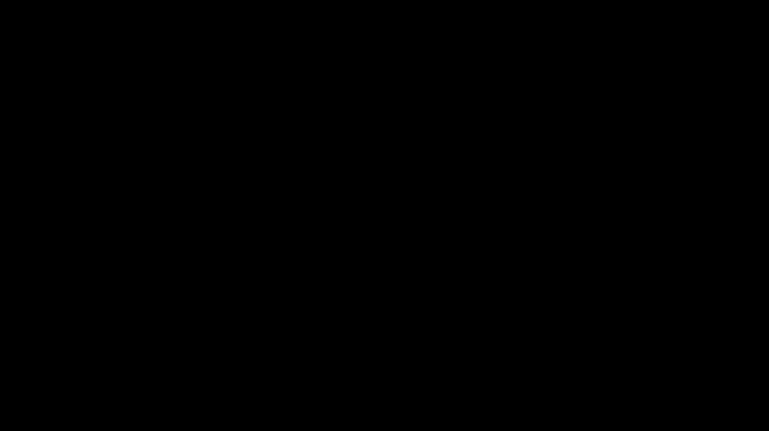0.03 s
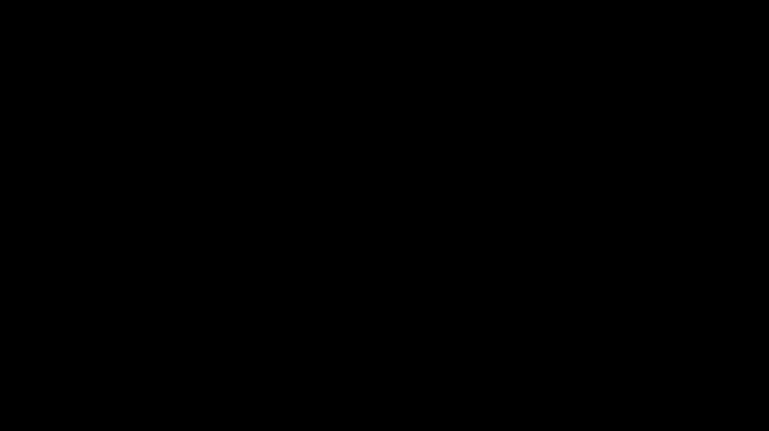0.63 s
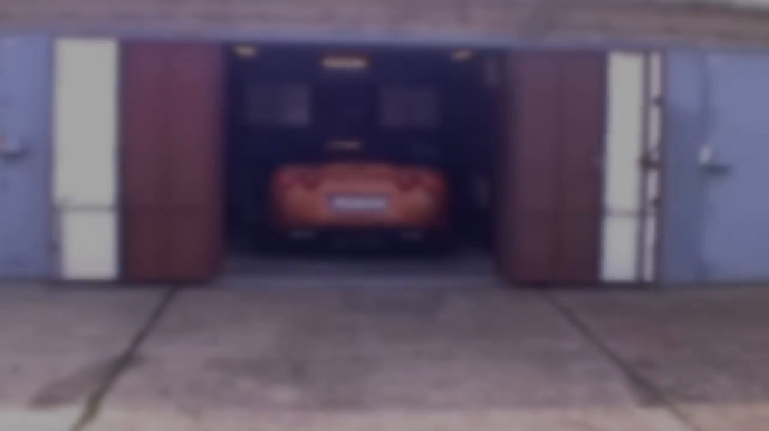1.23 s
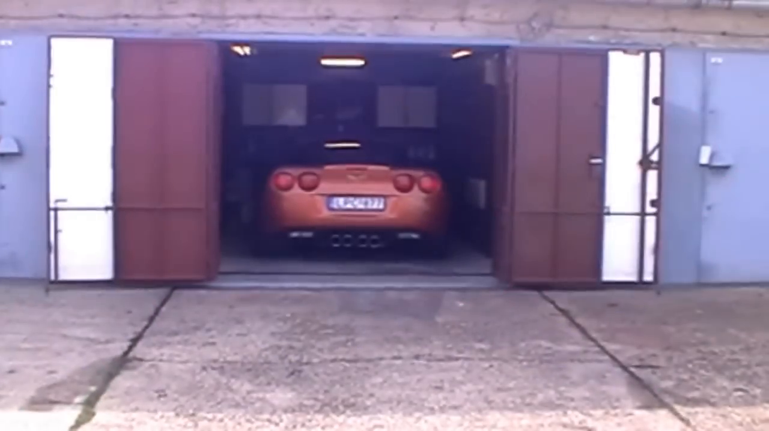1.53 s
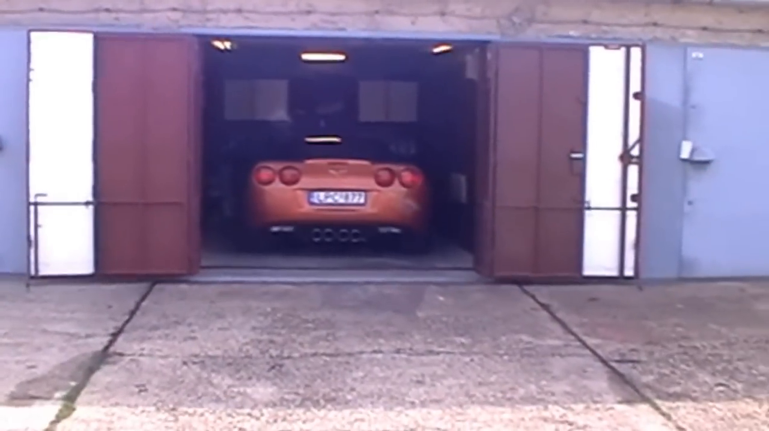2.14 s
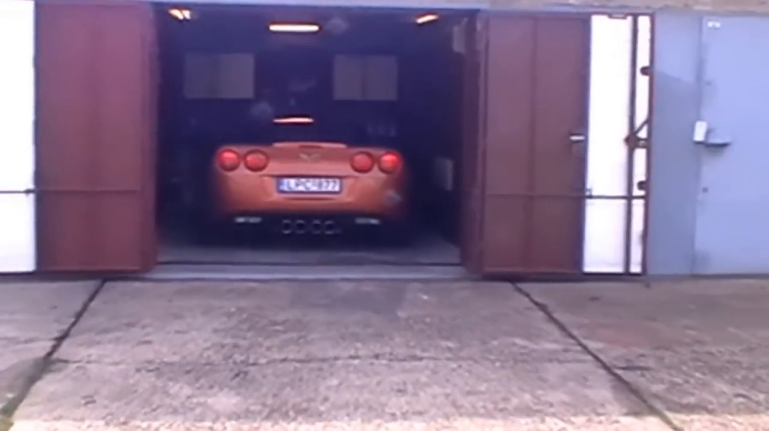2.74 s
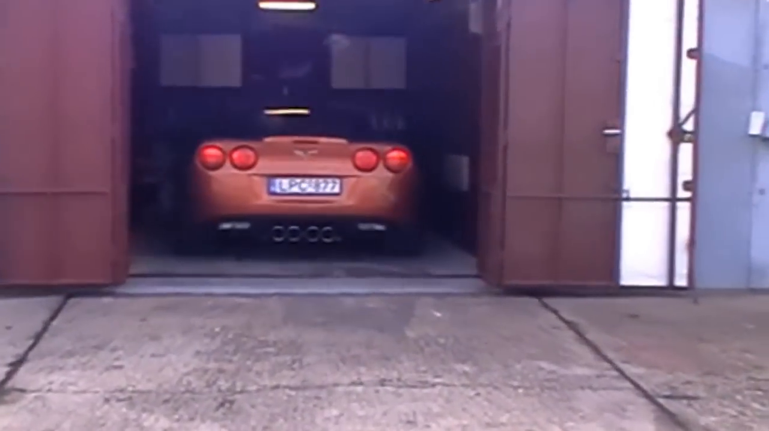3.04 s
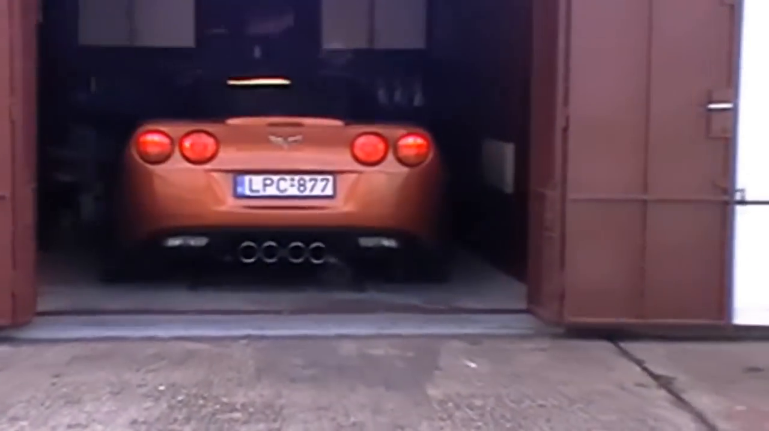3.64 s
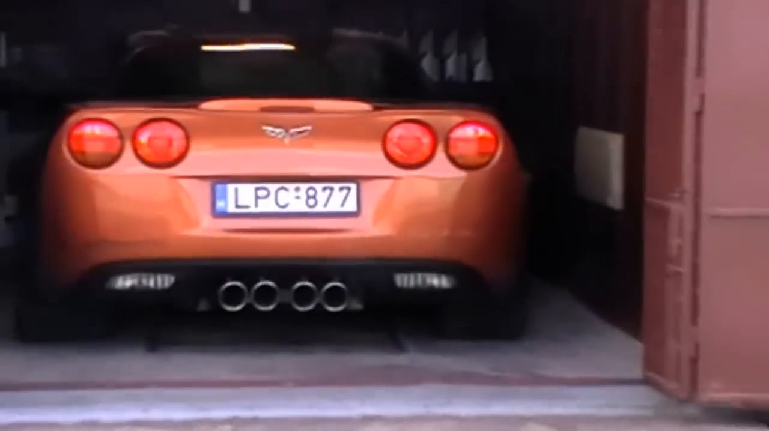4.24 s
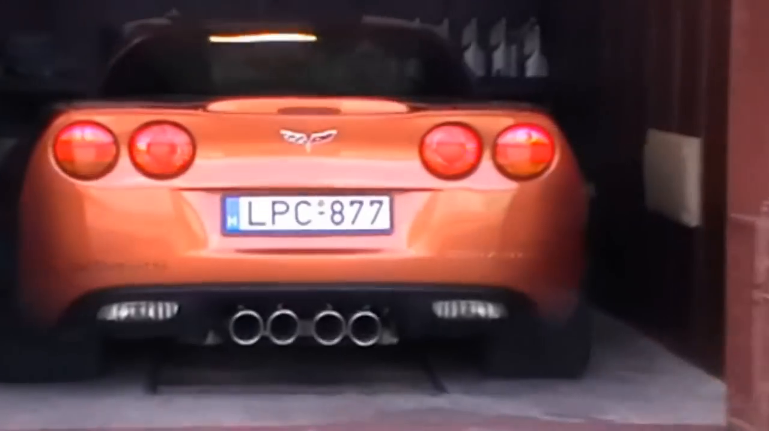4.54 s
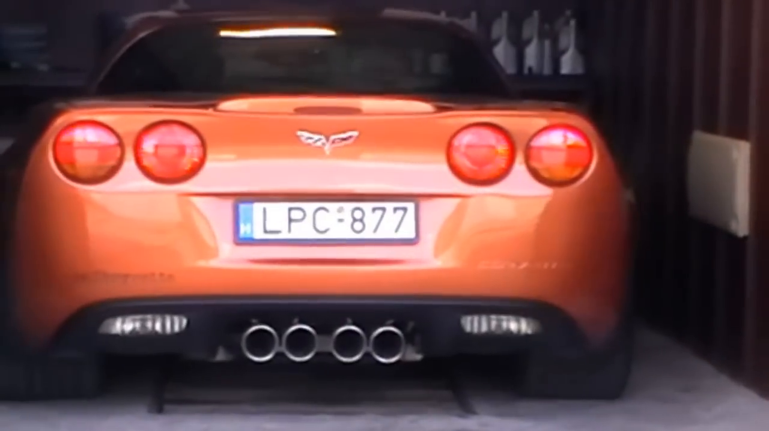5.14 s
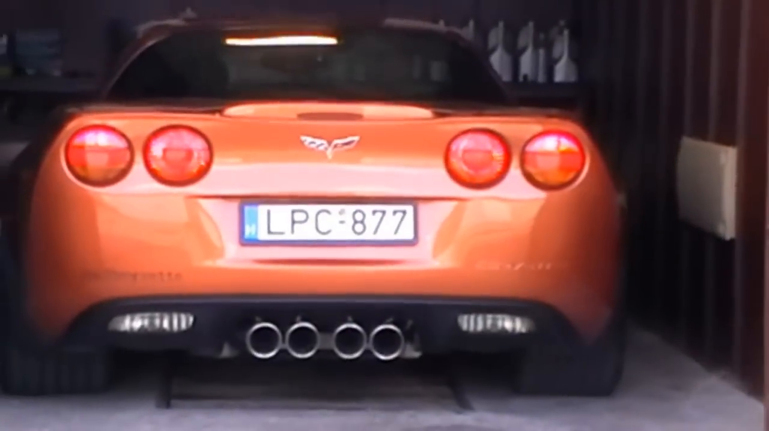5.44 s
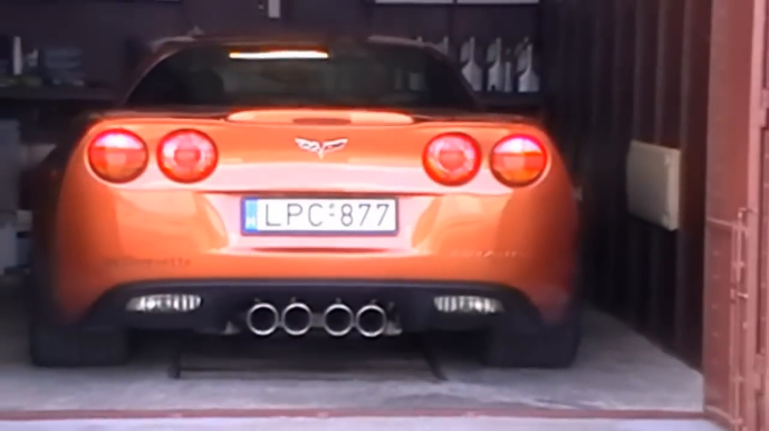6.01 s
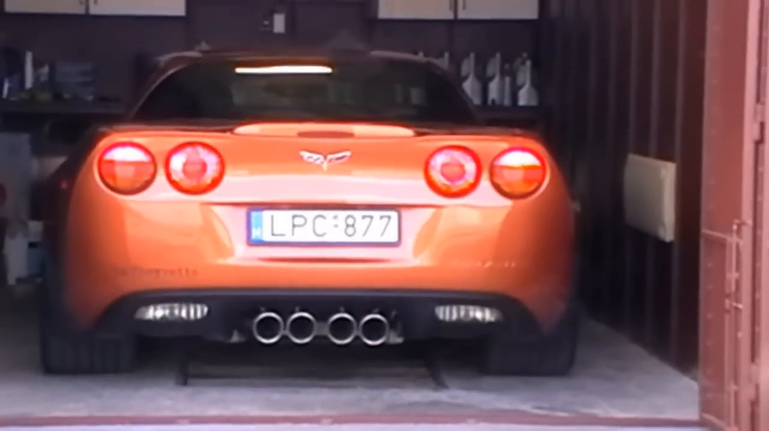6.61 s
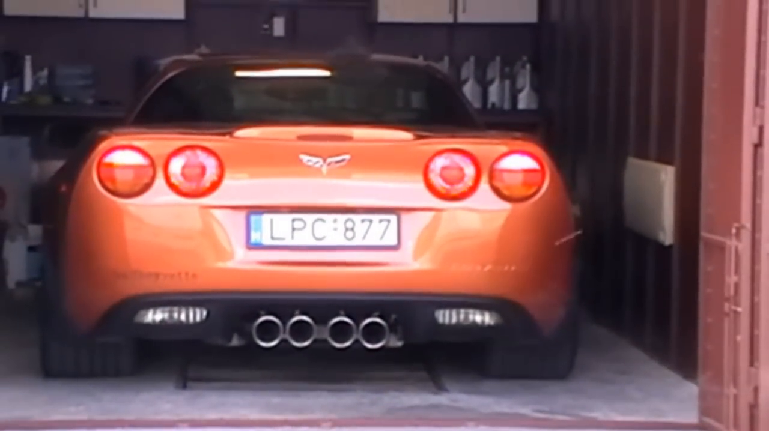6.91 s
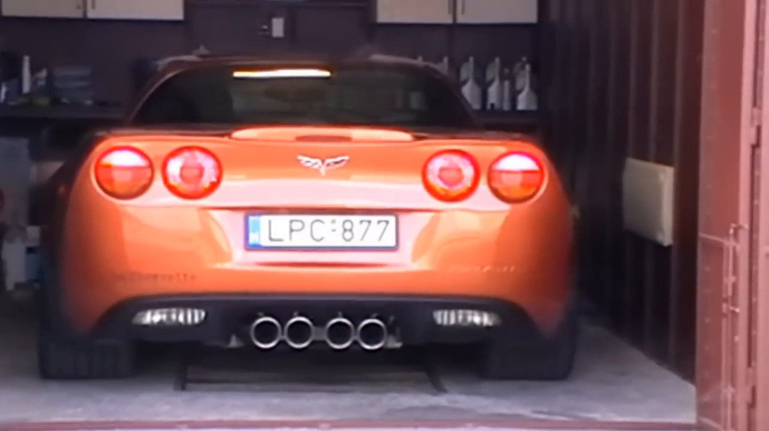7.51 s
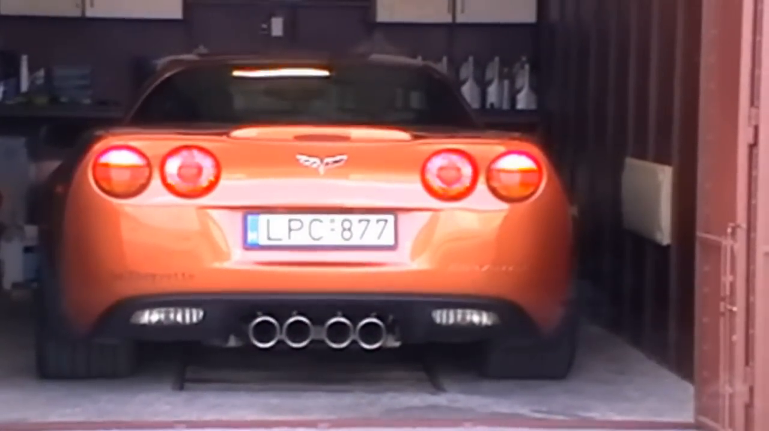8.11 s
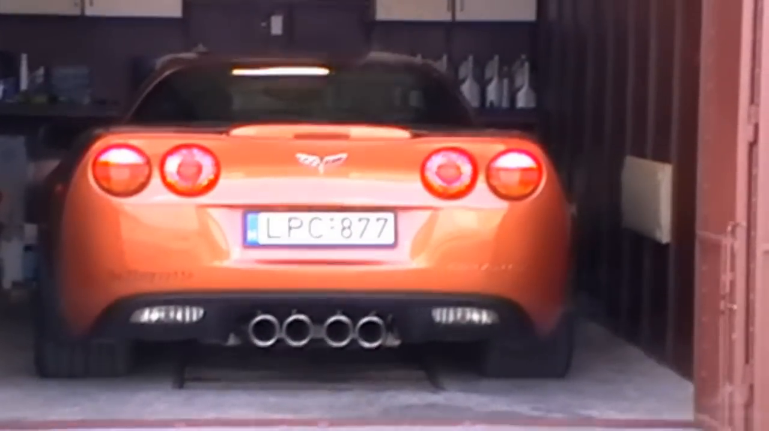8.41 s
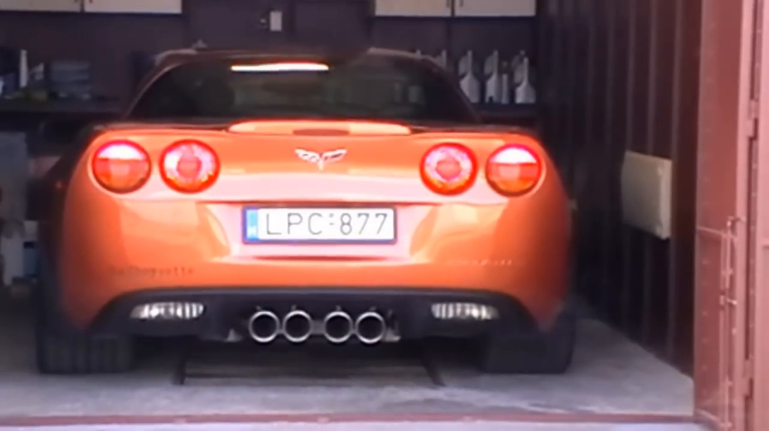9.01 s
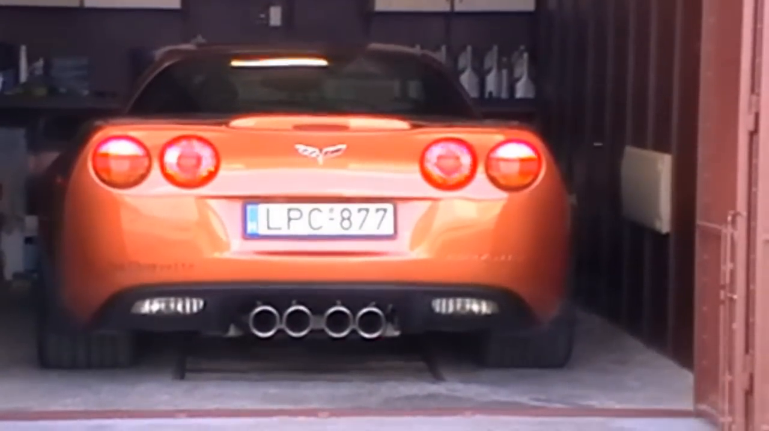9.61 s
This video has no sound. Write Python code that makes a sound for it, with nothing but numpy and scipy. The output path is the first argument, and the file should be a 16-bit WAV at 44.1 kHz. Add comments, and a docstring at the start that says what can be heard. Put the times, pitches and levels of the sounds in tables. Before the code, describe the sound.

A starter grinds and a big eight-cylinder engine catches with a bang, then drops to a throbbing idle booming through open garage doors.

```python
"""A quiet yard hums; then soft scuffs and a relay's click come through the open doors of a garage.
Inside, a big eight-cylinder sports car starts cold, heard from a stereo pair of microphones in the yard.
The starter grinds over a few compressions, the engine catches with a bang, flares, coasts down in a
smooth drone and takes up a loping idle of exhaust pulses, gas rasp and valve ticks.
The garage booms whenever the hunting idle meets its lowest resonance."""
import sys
import numpy as np
from scipy import signal
from scipy.fft import rfft, irfft, next_fast_len
from scipy.io import wavfile
from scipy.ndimage import uniform_filter1d, minimum_filter1d

SR = 44100
rng = np.random.default_rng(int(sys.argv[2]) if len(sys.argv) > 2 else 0)


def int16_out(signal):
    """Quantize to a 16-bit WAV file."""
    q = np.round(np.clip(np.atleast_2d(signal).T, -1, 1) * 32767)
    wavfile.write(sys.argv[1], SR, q.astype(np.int16))


N = 429975
TIME = np.arange(N) / SR
LEFT_RIGHT = np.array([[1], [-1]])
CATCH_S, STARTER_ON_S, STARTER_OFF_S = 3.315, 2.56, 3.4
TOP_HZ = 15600


def undb(db):
    """Decibels to amplitude."""
    return 10 ** (np.asarray(db) / 20)


def unit(x):
    """Scale to rms 1."""
    return x / np.sqrt(np.mean(x ** 2))


def after(s, rise_s):
    """A gate that opens at s."""
    return np.clip((TIME - s) / rise_s, 0, 1)


def gate(on_s, rise_s, off_s, fall_s):
    """Attack, hold and release."""
    return after(on_s, rise_s) * (1 - after(off_s, fall_s))


def swell(s, rise_s, decay_s):
    """Rise to a peak at s, then die away."""
    return after(s - rise_s, rise_s) * np.exp(-np.maximum(TIME - s, 0) / decay_s)


def noise():
    """White noise."""
    return rng.standard_normal(N)


def walk(per_s):
    """Slow random drift with a spread near 1."""
    hold = int(SR / per_s)
    steps = np.repeat(rng.standard_normal(N // hold + 1), hold)
    return 1.3 * uniform_filter1d(uniform_filter1d(steps, hold), hold)[:N]


def scatter(count, spread_db):
    """Random strengths within a range of dB."""
    return undb(spread_db * rng.uniform(-1, 1, count))


def colour(x, points, size=16384):
    """Minimum-phase filter through (f/Hz, level/dB) points."""
    hz, db = np.transpose(points)
    bins_hz = np.maximum(np.arange(size // 2 + 1) * SR / size, 1)
    cepstrum = irfft(np.log(undb(np.interp(np.log(bins_hz), np.log(hz), db))))
    cepstrum[1:size // 2] *= 2
    cepstrum[size // 2 + 1:] = 0
    return signal.fftconvolve(x, irfft(np.exp(rfft(cepstrum))))[:N]


def band_noise(points):
    """Coloured noise at rms 1."""
    return unit(colour(noise(), points))


def pulses(times, sizes):
    """One click at each time."""
    return np.bincount(np.clip(times * SR, 0, N).astype(int), sizes, N + 1)[:N]


def fade(x, decay_s):
    """Give every click an exponential tail."""
    return signal.lfilter([1], [1, -np.exp(-1 / (decay_s * SR))], x)


# open air all around the microphones: f/Hz, level/dB
YARD_SPECTRUM = [(18,-40), (35,-11.5), (60,-5.5), (110,-1), (165,-2.5), (225,-9.5), (375,-9.5), (470,-16.5),
                 (1090,-22.5), (1600,-25), (3600,-35), (7000,-40.5), (15000,-50.5)]
def yard():
    """Quiet outdoor hum that wavers a little."""
    mid, side = (band_noise(YARD_SPECTRUM) * undb(0.8 * walk(9.5)) for _ in range(2))
    return undb(-43.5) * (mid + undb(-4.5) * side * LEFT_RIGHT)


def garage(x, wet_db, side_db, t60_s=0.42):
    """Direct sound and the garage's tail; the two microphones differ most in the top octave."""
    t = TIME[:int(.7 * SR)]
    tails = rng.standard_normal((2, len(t))) * undb(-60 * t / t60_s) * (t > .004)
    mid, side = (signal.fftconvolve(x, tail / np.linalg.norm(tail))[:N] for tail in tails)
    side = colour(side, [(150, -1), (600, -2), (4000, -2), (7000, -4.5), (11000, 11.5)])
    return (x + undb(wet_db) * mid + undb(side_db) * side * LEFT_RIGHT) / np.hypot(1, undb(wet_db))


def garage_rumble(gas_db):
    """Exhaust flow stirs the lowest resonance of the garage."""
    air = [(12, -9), (30, 1.5), (50, 2.5), (62, 14), (74, 12), (110, 4.5), (400, -44.5)]
    mid, side = band_noise(air), band_noise(air)
    return (mid + undb(-4) * side * LEFT_RIGHT) * undb(-20 + 0.51 * gas_db) * after(CATCH_S, .02)


# clicks from the car indoors, the loudest the ignition relay: t/s, level/dB, decay/s, low-pass f/Hz
CAR_CLICKS = [(0.837, -33.5, 0.0034, 5000), (1.6, -43, .012, 4000), (2.167, -30.5, 0.022, 15000)]
# their tone from the yard: f/Hz, level/dB
CLICK_SPECTRUM = [(300, -20), (750, 4), (1300, -4), (2100, 4.5), (3200, 4), (4500, -8.5), (8000, -2),
                  (11000, -11), (15500, -27)]
# soft scuffs in the garage: t/s, level/dB, half length/s
SOFT_SCUFFS = [(0.754, -49, 0.065), (2.434, -44, 0.036)]
def clicks_and_scuffs():
    """Sharp clicks and dull scuffs echo in the garage before the start."""
    click = band_noise(CLICK_SPECTRUM)
    sound = 0
    for s, db, decay_s, top_hz in CAR_CLICKS:
        dulled = signal.sosfilt(signal.butter(2, min(top_hz, TOP_HZ), fs=SR, output="sos"), click)
        sound += undb(db) * dulled * after(s, 0.0035) * np.exp(-np.abs(TIME - s) / decay_s)
    scuffs = sum(undb(db) * np.exp(-((TIME - s) / half_s) ** 2) for s, db, half_s in SOFT_SCUFFS)
    sound += scuffs * band_noise([(200, -11), (700, 6), (1400, -3), (3000, -15), (12000, -38)])
    return garage(sound, wet_db=-2.5, side_db=-6, t60_s=0.55)


# metal modes inside the car: f/Hz, t60/s, level/dB
METAL_MODES = [(619, 0.3, 3), (881.5, 0.31, 9.5), (1065, 0.15, -5), (1350, 0.44, 6.5), (1560, 0.42, -8.5),
               (2112, 0.073, 4.5), (3030, .2, -28), (4106, .2, -6.5)]
def drivetrain(x, ring_db):
    """Metal parts ring along with whatever shakes them."""
    t = TIME[:SR // 2]
    ring = sum(undb(db - 60 * t / t60) * np.cos(2 * np.pi * hz * t) / t60 for hz, t60, db in METAL_MODES)
    return x + undb(ring_db) * signal.fftconvolve(x, ring)[:N] / SR


# valve gear and belts, faint from out in the yard: f/Hz, level/dB
VALVE_SPECTRUM = [(700, -20.5), (1600, 2.5), (2300, 3.5), (3200, -1), (4300, -9.5), (5500, -5),
                  (7600, -1.5), (9000, -6.5), (10700, -12.5), (12000, -23.5), (14000, -26), (15500, -37.5)]
def valve_gear(times, cylinder, valve_db):
    """Four uneven ticks a cycle over the hiss of belts and intake."""
    tick_times = times[cylinder % 2 == 1]
    ticks = pulses(tick_times, scatter(len(tick_times), spread_db=9.5))
    clatter = unit(unit(fade(ticks, 0.0074)) + 1.1) * undb(valve_db)
    hiss = unit(colour(drivetrain(noise(), ring_db=-2), VALVE_SPECTRUM))
    return garage(clatter * hiss * after(STARTER_OFF_S - .04, 0.037), wet_db=-6.5, side_db=-12)


# the starter's labour, hardest as the engine overruns it: peak t/s, rise/s, level/dB
STARTER_LOADS = [(2.85, .16, -18), (3.0, 0.034, -12.5), (3.138, 0.036, -11), (3.252, 0.013, -15.5),
                 (3.395, 0.024, -2.5)]
# bell housing and engine block, through the open doors: f/Hz, level/dB
HOUSING_SPECTRUM = [(50, -14), (110, -14), (175, -4), (245, -17.5), (320, 1), (420, -14.5), (520, -7.5),
                    (660, -0.5), (900, -1.5), (1150, -3), (1450, -4), (1700, -13), (3000, -17.5),
                    (8000, -54)]
# clashing teeth, from the same spot: f/Hz, level/dB
TOOTH_SPECTRUM = [(900, -17.5), (1800, -5), (3000, -0.5), (4500, -3.5), (5600, 0), (6800, -2.5), (8500, -8),
                  (10500, -17), (13000, -27), (15500, -47)]
def starter():
    """Pinion teeth clash on the ring gear and shake the bell housing, harder at each compression."""
    labour = sum(undb(db) * swell(s, rise_s, decay_s=0.038) for s, rise_s, db in STARTER_LOADS)
    scrape = undb(-15) * swell(STARTER_ON_S + 0.0095, 0.0076, decay_s=0.055)  # the teeth first meet
    mesh_hz = 230 * (1 + .1 * walk(9))
    teeth_passed = np.cumsum(mesh_hz) / SR
    times = np.interp(np.arange(int(teeth_passed[-1])), teeth_passed, TIME)
    teeth = unit(fade(pulses(times, scatter(len(times), spread_db=6.5)), 0.0019)) + 2
    grind = unit(colour(drivetrain(teeth * noise(), ring_db=22.5), HOUSING_SPECTRUM))
    grind *= np.hypot(undb(-19.5), labour)
    clash = unit(colour(drivetrain(teeth * noise(), ring_db=24.5), TOOTH_SPECTRUM))
    clash *= np.hypot(undb(-24), scrape + undb(-7.5) * labour)
    # the solenoid slams the pinion home
    clank = band_noise([(300, -18), (800, -4), (1000, 6.5), (1300, -11), (1800, -30), (3500, -6),
                        (5000, -31), (8000, -14), (12000, -33)])
    clank *= undb(-12.5) * np.exp(-np.maximum(TIME - STARTER_ON_S, 0) / 0.065)
    sound = (grind + clash + clank) * gate(STARTER_ON_S - .01, 0.027, STARTER_OFF_S - .04, 0.04)
    return garage(sound, wet_db=-4, side_db=-10.5, t60_s=0.65) * undb(-.5 * LEFT_RIGHT)


def catch():
    """The first rich firings shove out a low, ragged gust."""
    gust = band_noise([(15, -18), (35, -4), (65, 8), (110, -3), (300, -3.5), (1500, -52)])
    return garage(gust * undb(-9.5) * gate(CATCH_S, 0.012, 3.46, 0.081), wet_db=-21, side_db=-10.5)


def bark(times, sizes):
    """Under the first load the firings bark in the upper pipe resonances."""
    pipes = [(20, -45), (230, -19), (295, 8), (345, -1), (400, -18.5), (490, -6), (560, -22), (6000, -83)]
    ring = unit(colour(pulses(times, np.sqrt(sizes)), pipes))
    return garage(ring * undb(-12) * gate(3.34, 0.088, 3.47, 0.19), wet_db=1, side_db=-16)


# engine speed: t/s, four-stroke cycle f/Hz
CYCLE_RATE = [(3.32, 16.875), (3.43, 21.302), (3.83, 23.8), (4.23, 20.102), (4.68, 19.739), (5.5, 17.032),
              (5.67, 17.097), (6.54, 16.47), (7.2, 17.092), (7.98, 16.66), (8.53, 17.276), (8.87, 17.072),
              (9.75, 17.071)]
def engine_speed():
    """A flare, then a hunting idle: the cycle rate and the running count of cycles."""
    cycle_hz = np.interp(TIME, *np.transpose(CYCLE_RATE))
    return cycle_hz, np.cumsum(cycle_hz) / SR


# catch, flare, coast and idle from the yard: t/s, settling/s, level/dB of firings, gas and valve gear
START_STAGES = [(3.315, .01, -10.5, -15, -27.5), (3.42, 0.12, -17.5, -40, -44.5),
                (3.941, .06, -23.5, -43, -57.5), (4.88, 0.32, -12.5, -31, -43)]
def stage_levels():
    """Levels of firings, gas and valve gear, each gliding from one stage's value to the next."""
    levels = np.array(START_STAGES)[:, 2:, None]
    lag = np.array([[1], [1.4], [1]])  # the gas settles more slowly
    db = levels[0]
    for (s, settle_s, *_), step in zip(START_STAGES[1:], np.diff(levels, axis=0)):
        db = db + step * (1 - np.exp(-np.maximum(TIME - s, 0) / (settle_s * lag)))
    return db


# cylinders in firing order: even-cycle level/dB, odd-cycle level/dB, early by t/ms
FIRING_ORDER = [(3.4, -26.1, 3.6), (11.9, 12.2, 0.3), (11.6, -6.6, 0.2), (-7.9, 5.5, 2.6), (-2.2, 2.5, 1.7),
                (3.5, 5.0, 0.9), (-34.0, 9.9, 0.7), (8.7, 6.4, -0.0)]
def firings(cycles):
    """Time, strength and cylinder of every firing; the lope spans two cycles and no two burn alike."""
    count = len(FIRING_ORDER)
    index = np.arange(int(count * cycles[-1]))
    cylinder, odd = index % count, index // count % 2
    table, chance = np.array(FIRING_ORDER), rng.standard_normal((len(index), 2))
    times = np.interp(index / count, cycles, TIME) - table[cylinder, 2] / 1000
    times += 0.00023 * chance[:, 0]
    sizes = undb(table[cylinder, odd] + 1.22 * chance[:, 1]) * (times > CATCH_S)
    return times, sizes, cylinder


def boom(cycle_hz, cycles, room_hz=66.15, width_hz=5.8):
    """One cylinder bank's beat drives the garage's lowest resonance as the idle load builds."""
    beats = len(FIRING_ORDER) / 2
    detune = (beats * cycle_hz - room_hz) / (width_hz / 2)
    return np.sin(2 * np.pi * beats * cycles) * undb(-19) * after(5.14, 1) / (1 + detune ** 2)


# sidebands of the firing tone as they leave the pipes: f/Hz, level/dB
SIDEBAND_RESPONSE = [(138,-43.5), (160,-1), (182,-17.5), (205,-26), (230,-22)]
def drone(cycle_hz, cycles, swell_phase=0.33):
    """The firing tone swells once a cycle; the pipes favour one sideband or the other as speed changes."""
    count = len(FIRING_ORDER)
    tone = np.sin(2 * np.pi * count * cycles)
    for offset in (-1, 1):
        db = np.interp((count + offset) * cycle_hz, *np.transpose(SIDEBAND_RESPONSE))
        tone += undb(db) * np.sin(2 * np.pi * (count * cycles + offset * (cycles + swell_phase)))
    first_surge = undb(-1) * gate(CATCH_S, .025, CATCH_S + .12, .08)
    light_load = undb(-8) * gate(3.62, 0.1, 5.04, 0.54)
    return tone * (first_surge + light_load)


# gas leaving the tailpipes, heard from the yard: f/Hz, level/dB
GAS_SPECTRUM = [(200,-5), (430,-2.5), (490,8), (570,-21), (615,5), (700,2), (800,-1.5), (880,-1.5),
                (1030,-7.5), (1150,-9), (1350,-13), (1700,-22), (3000,-25.5), (8000,-45), (14000,-71)]
# pops in the exhaust as the flare dies down: t/s, level/dB
FUEL_POPS = [(3.728, -14), (3.931, -18), (4.397, -29.5)]
def gas_rasp(blows, gas_db):
    """Each firing lets out a puff of gas and a clean knock; now and then unburnt fuel pops."""
    puffs = unit(fade(blows, 0.013)) + 1
    gas = unit(drivetrain(puffs * noise(), ring_db=15)) + undb(-7) * unit(blows)
    rasp = unit(colour(gas, GAS_SPECTRUM)) * undb(gas_db)
    pop_s, pop_db = np.transpose(FUEL_POPS)
    pops = uniform_filter1d(fade(pulses(pop_s, undb(pop_db)), decay_s=.005), size=100)
    return rasp + pops * band_noise(GAS_SPECTRUM)


# silencers and tailpipes, through the open doors: f/Hz, level/dB
PIPE_RESPONSE = [(8,-75.5), (45,-35.5), (112,-30), (135,-11.5), (154,1.5), (172,-10.5), (190,1.5),
                 (228,-13), (252,-24), (280,-12), (345,-19), (385,-34), (490,-36), (5000,-105)]
def exhaust(cycle_hz, cycles, blows, fire_db, gas_db):
    """Firings ring the pipes under the rasp; the throb swells once a cycle and wanders in level."""
    lope_db = 0.86 * np.cos(2 * np.pi * (cycles - 0.37)) + walk(14)
    throb = unit(colour(blows, PIPE_RESPONSE) * undb(lope_db)) * undb(fire_db)
    running = after(CATCH_S, 0.011)
    rasp = gas_rasp(blows, gas_db) * running
    low = (throb + boom(cycle_hz, cycles) + drone(cycle_hz, cycles)) * running
    # low notes reach the two microphones slightly out of phase
    skew = undb(-15.5) * signal.hilbert(low, next_fast_len(N))[:N].imag * LEFT_RIGHT
    low = garage(low, wet_db=-24.5, side_db=-21) + skew
    return low + garage(rasp, wet_db=-4.5, side_db=-10.5) * undb(-.7 * LEFT_RIGHT)


def scene():
    """The car in its garage, a touch right of centre, with the yard around the microphones."""
    cycle_hz, cycles = engine_speed()
    fire_db, gas_db, valve_db = stage_levels()
    times, sizes, cylinder = firings(cycles)
    engine = exhaust(cycle_hz, cycles, pulses(times, sizes), fire_db, gas_db)
    engine += valve_gear(times, cylinder, valve_db)
    car = clicks_and_scuffs() + starter() + catch() + bark(times, sizes) + engine + garage_rumble(gas_db)
    return car * undb(-.2 * LEFT_RIGHT) + yard()


def record(dry, open_s=.22):
    """The microphones open after a moment; a limiter holds the loudest peaks and the top is cut."""
    safe_gain = 1 / np.maximum(np.abs(dry).max(axis=0), 1)
    gain = uniform_filter1d(minimum_filter1d(safe_gain, size=120), size=120)
    low_pass = signal.ellip(10, .2, 80, TOP_HZ, fs=SR, output="sos")
    return signal.sosfilt(low_pass, dry * gain * after(open_s, 0.0054))


dry = scene()
out = record(dry)
int16_out(out)
```